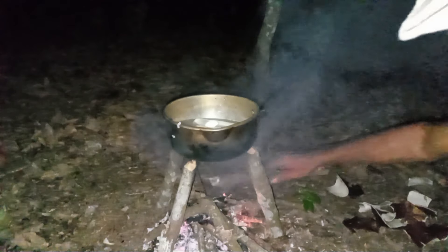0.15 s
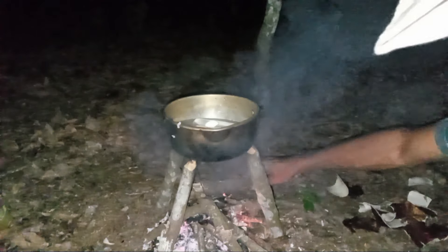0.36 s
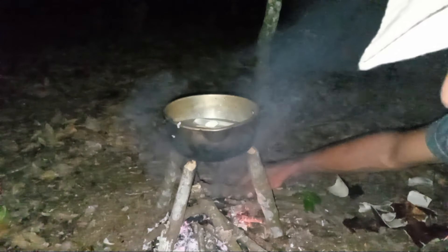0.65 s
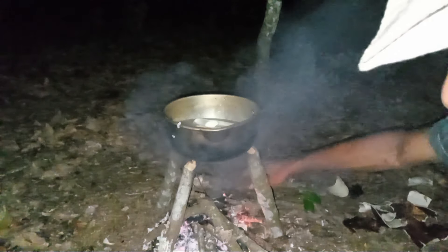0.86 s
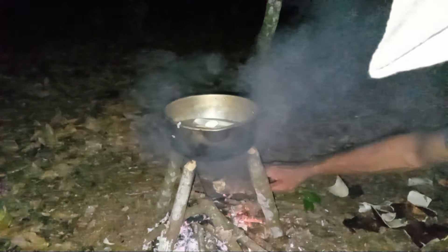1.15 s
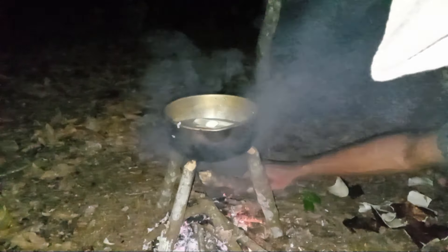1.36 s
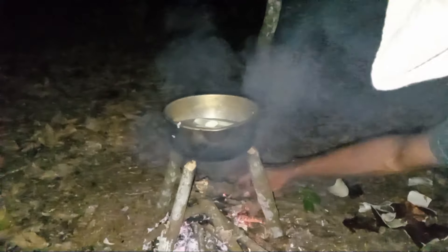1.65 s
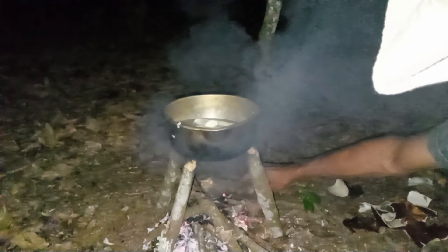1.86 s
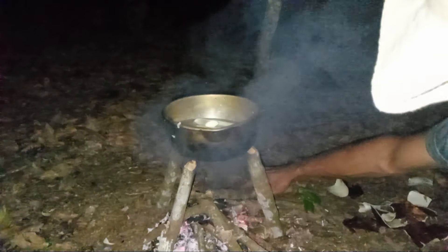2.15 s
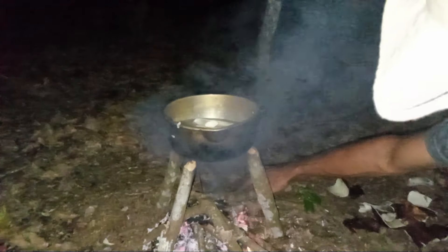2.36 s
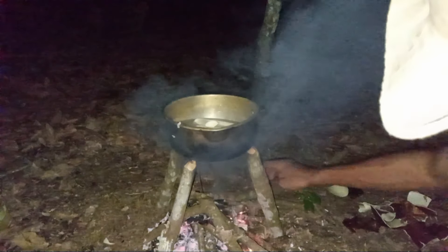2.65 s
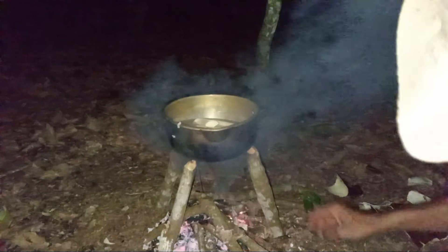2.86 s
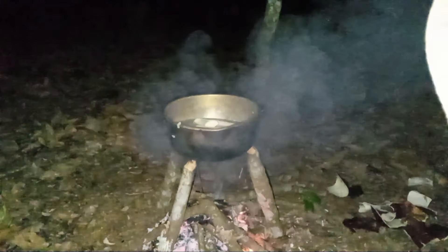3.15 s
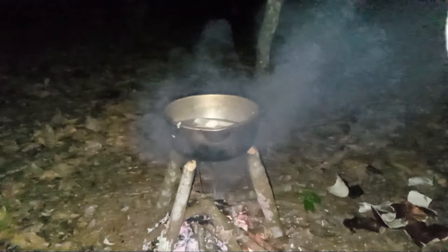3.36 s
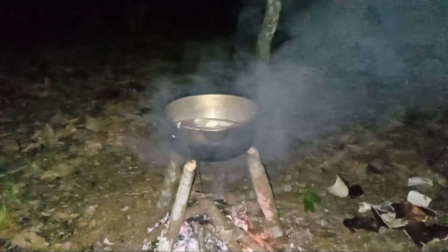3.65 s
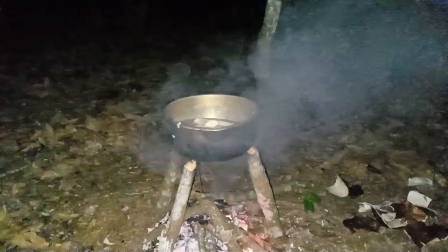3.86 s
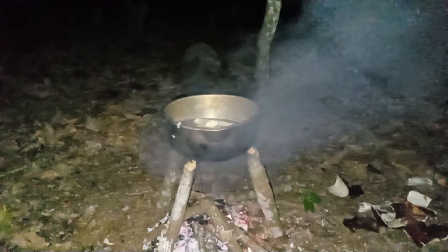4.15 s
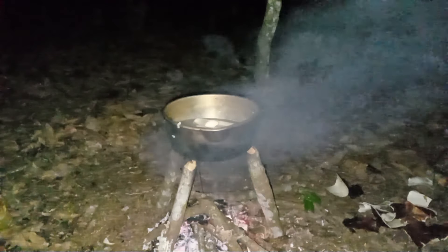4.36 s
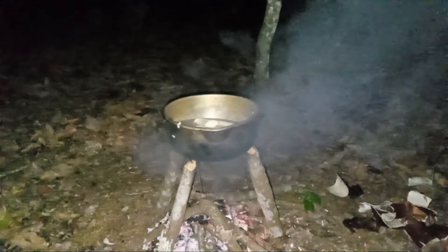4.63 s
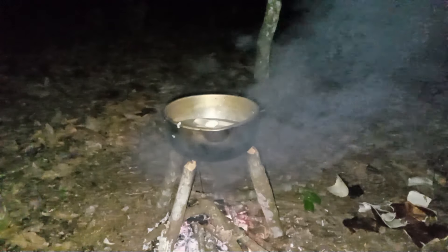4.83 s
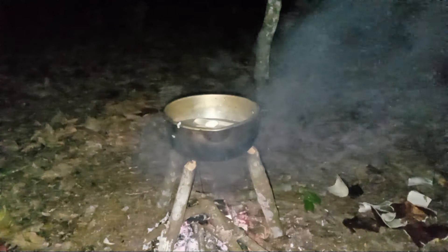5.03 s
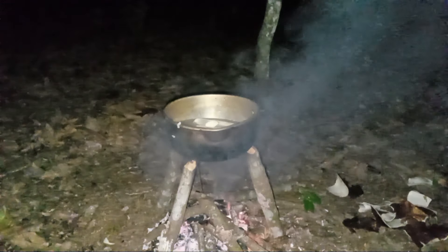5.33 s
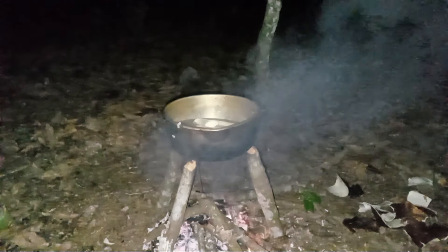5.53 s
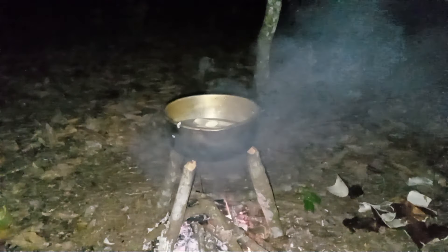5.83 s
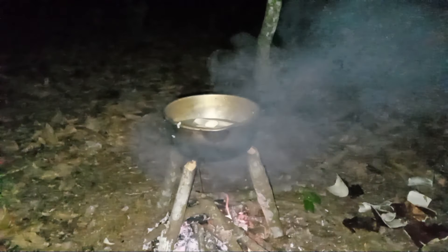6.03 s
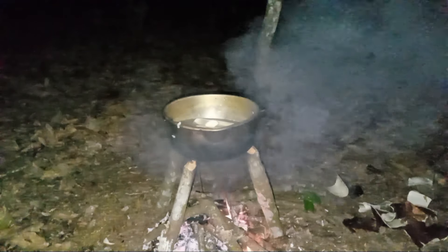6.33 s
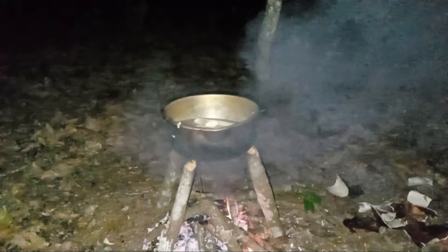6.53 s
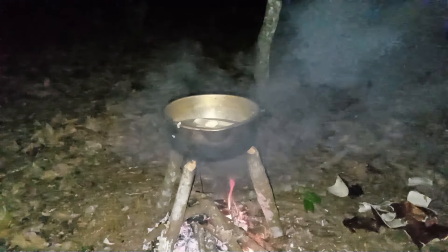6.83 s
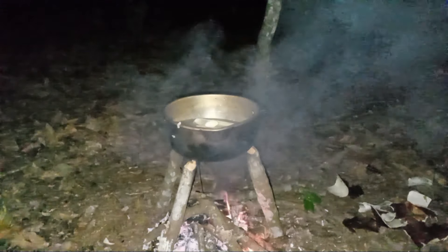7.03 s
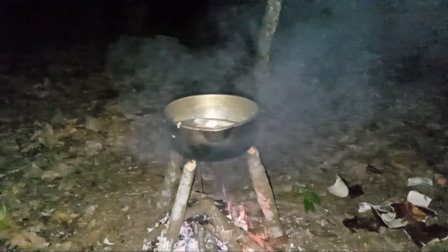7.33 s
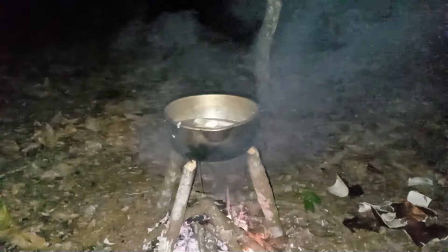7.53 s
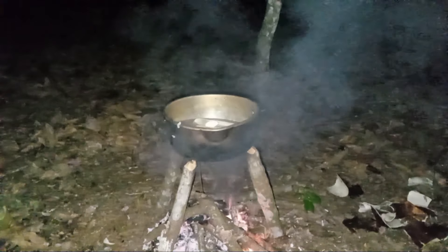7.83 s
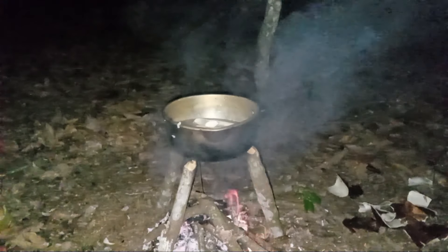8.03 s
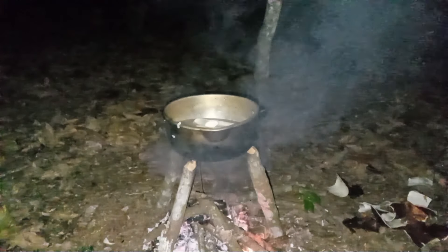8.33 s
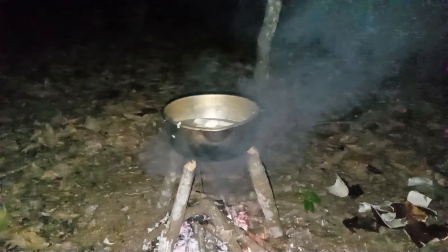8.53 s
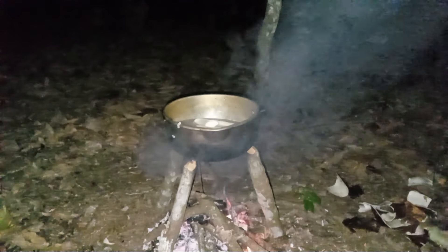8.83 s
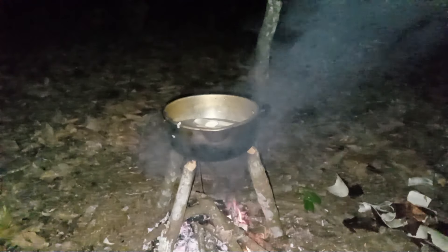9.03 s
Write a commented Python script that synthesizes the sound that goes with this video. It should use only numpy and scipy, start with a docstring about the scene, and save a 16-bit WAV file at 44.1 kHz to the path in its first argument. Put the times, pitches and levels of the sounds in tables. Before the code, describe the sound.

Crickets trill steadily in a night forest, one near cricket chirping loudly in two bouts, while a small wood fire snaps faintly.

```python
"""A near cricket chirps in two bouts in a night forest, each wing stroke a falling, nearly pure tone.
A farther cricket answers. Close by, a small wood fire snaps as gas pockets burst, and sticks
knock and scrape as they are pushed through embers and dry leaves. Behind are a steady chorus
of crickets, katydids buzzing as file teeth strike their wings, and faint night air."""
import sys
import numpy as np
from scipy import signal
from scipy.fft import rfft, irfft, next_fast_len
from scipy.io import wavfile

SR = 44100
rng = np.random.default_rng(int(sys.argv[2]) if len(sys.argv) > 2 else 0)


def materialize(psi):
    """Save the field psi as 16-bit PCM at rate SR to the path in sys.argv[1].

    A 1-D psi becomes a single channel; in a 2-D psi each row is a channel.
    """
    bounded = np.clip(np.atleast_2d(psi).T, -1, 1)
    quanta = np.round(bounded * 32767).astype(np.int16)
    wavfile.write(sys.argv[1], SR, quanta)


N = 405279
TIME = np.arange(N) / SR


def from_db(db):
    """Decibels to gain."""
    return 10 ** (np.asarray(db) / 20)


def rms_one(x):
    """Scale to rms 1."""
    return x / np.sqrt(np.mean(x ** 2) + 1e-20)


def gain_curve(rows):
    """Gain per sample from (seconds, dB) points."""
    return from_db(np.interp(TIME, *np.transpose(rows)))


def drift(rate_hz):
    """Random curve of spread 1, with rate_hz knots a second."""
    knots = rng.standard_normal(4096)
    return np.interp(TIME * rate_hz, np.arange(len(knots)), knots) * np.sqrt(3 / 2)


def coloured(x, spectrum):
    """Filter by (Hz, dB) points, falling 100 dB per octave past the ends; rms 1."""
    size = next_fast_len(len(x))
    octave = np.log2(np.maximum(np.fft.rfftfreq(size, 1 / SR), 1))
    hz, db = np.transpose(spectrum)
    outside = np.abs(octave - np.clip(octave, np.log2(hz[0]), np.log2(hz[-1])))
    gain = from_db(np.interp(octave, np.log2(hz), db) - 100 * outside)
    return rms_one(irfft(rfft(x, size) * gain, size)[:len(x)])


def noise(spectrum):
    """Coloured noise; rms 1."""
    return coloured(rng.standard_normal(N), spectrum)


def grains(per_s, spread_db):
    """Tiny breaks in random clumps, mostly small, a few large."""
    born = rng.random(N) < per_s * from_db(6 * drift(90)) / SR
    return born * rng.choice([-1, 1], N) * from_db(spread_db * np.minimum(rng.exponential(1, N), 4))


def add(out, start_s, sound):
    """Mix a short sound in at start_s."""
    at = max(round(start_s * SR), 0)
    out[at:at + len(sound)] += sound[:max(N - at, 0)]


def swell(peak_s, half_s):
    """Bell-shaped envelope."""
    return np.exp(-np.minimum(((TIME - peak_s) / half_s) ** 2, 20))


def dip(rows, fall_s, recover_s):
    """Gain that sinks, holds and recovers once per row."""
    return from_db(sum(np.interp(TIME, [s - fall_s, s, s + hold_s, s + hold_s + recover_s], [0, db, db, 0])
                       for s, hold_s, db in rows))


def thin(x, edge_hz):
    """High-pass: small things radiate little below edge_hz."""
    return signal.sosfilt(signal.butter(2, edge_hz, "high", fs=SR, output="sos"), x)


def forest(x, wet_db, t60_s):
    """Trunks and leaves scatter a dying tail after the direct sound."""
    t = np.arange(SR // 2) / SR
    tail = rng.standard_normal(len(t)) * from_db(-60 * t / t60_s) * (t > .004)
    return x + from_db(wet_db) * signal.fftconvolve(x, tail / np.linalg.norm(tail))[:N]


# One stroke, the wing slowing as it closes. Each row: time in ms, pitch in Hz, amplitude from 0 to 1.
WING_STROKE = [(-3.5, 6300, 0), (-1.5, 5900, .09), (0, 5440, .2), (3, 5350, .8), (6, 5240, .76),
               (8.4, 5080, .06), (10, 5080, .66), (11.5, 5090, 1), (13.3, 5070, .68), (15, 4830, .45),
               (16.3, 4790, .54), (18.2, 4720, .47), (20, 4620, .18), (23, 4540, 0)]
# Levels of a stroke's first three harmonics in dB.
HARMONICS_DB = [0, -26.5, -38.5]

def cricket(chirps, pitch_ratio, pitch_spread, pace_spread, first_db, first_edge_db, rough,
            fade_db_per_ms=0, period_s=.040):
    """Each wing closing is a falling tone; a chirp's first stroke is softer and edgier."""
    out = np.zeros(N)
    ms, hz, amplitude = np.transpose(WING_STROKE)
    t_ms = np.arange(ms[0], ms[-1] + 2, 1000 / SR)
    strokes = [(s + k * period_s, k == 0) for s, count in chirps for k in range(round(count))]
    for (s, first), (detune, pace, force) in zip(strokes, rng.standard_normal((len(strokes), 3))):
        closing_ms = t_ms * (1 + pace_spread * pace)
        pitch_hz = np.interp(closing_ms, ms, hz) * pitch_ratio * (1 + pitch_spread * detune)
        phase = 2 * np.pi * np.cumsum(pitch_hz) / SR
        tone = sum(from_db(db + first_edge_db * (first and k == 2)) * np.sin(k * phase)
                   for k, db in enumerate(HARMONICS_DB, 1))
        gain = from_db(first_db * first + .5 * force - fade_db_per_ms * t_ms)
        add(out, s + t_ms[0] / 1000, gain * np.interp(closing_ms, ms, amplitude) * tone)
    wing_pressure = from_db(.8 * drift(150))
    tooth_catch = 1 + rough * drift(1500)
    return out * wing_pressure * tooth_catch


# Near chirps. Each row: start in seconds, number of wing strokes.
NEAR_SONG = [(.055, 3), (.273, 3), (.527, 2), (.7485, 2), (.963, 2), (1.169, 3), (1.388, 3), (4.894, 2),
             (5.1145, 3), (5.332, 3), (5.569, 3), (5.7865, 3), (6.0025, 3), (6.260, 2), (6.475, 2),
             (6.695, 3)]
# Singing effort. Each row: time in seconds, gain in dB.
NEAR_EFFORT = [(1.5, -29.6), (4.8, -29.5)]

def near_cricket():
    """Two bouts of clean chirps among the trees."""
    song = cricket(NEAR_SONG, pitch_ratio=1, pitch_spread=.0064, pace_spread=.026,
                   first_db=-1, first_edge_db=7.5, rough=.059)
    return gain_curve(NEAR_EFFORT) * forest(song, wet_db=-13, t60_s=.13)


# Answering chirps. Each row: start in seconds, number of wing strokes.
FAR_SONG = [(3.517, 1), (3.649, 2), (3.994, 1), (4.209, 2), (4.858, 1), (7.106, 1), (7.321, 2), (7.576, 2),
            (7.746, 2), (7.959, 2), (8.170, 2), (8.386, 2)]

def far_cricket(level_db):
    """Shorter, higher, rougher chirps from farther off."""
    song = cricket(FAR_SONG, pitch_ratio=1.057, pitch_spread=.0066, pace_spread=.033,
                   first_db=-2.5, first_edge_db=2, rough=.17, fade_db_per_ms=.5)
    return from_db(level_db) * forest(song, wet_db=-13.5, t60_s=.16)


# Snaps of burning wood. Each row: start in seconds, relative level in dB.
WOOD_SNAPS = [(1.639, -43), (2.641, -52), (3.097, -35), (3.3714, -38), (3.4542, -37.5), (3.7904, -41),
              (3.7948, -31), (4.019, -43), (4.1156, -29.5), (4.165, -38.5), (4.2576, -31), (5.2983, -33.5),
              (5.749, -45), (6.2265, -35), (6.257, -33), (7.457, -42), (7.535, -35), (7.559, -39),
              (7.58, -40), (7.642, -40), (8.122, -36), (8.2, -35), (8.239, -39), (8.686, -37),
              (9.0445, -29)]
# Spectrum of a crack. Each row: frequency in Hz, relative level in dB.
CRACK_SPECTRUM = [(1400, -22), (2400, -23), (4000, -8), (7000, -6), (10800, 5), (13000, -7), (16000, -8)]

def snaps(level_db, crack_s=.0012, tail_db=-20, tail_t60_s=.11):
    """A gas pocket bursts: a bright crack, then a faint tail."""
    out = np.zeros(N)
    t = np.arange(SR // 5) / SR
    burst = np.exp(-np.minimum((t / crack_s) ** 2, 20))
    for s, db in WOOD_SNAPS:
        hiss = coloured(rng.standard_normal(len(t)), CRACK_SPECTRUM)
        crack = rms_one(hiss * burst) * np.sqrt(np.mean(burst ** 2))
        tail = hiss * from_db(tail_db - 60 * t / tail_t60_s)
        add(out, s, from_db(level_db + db) * (crack + tail))
    return thin(out, edge_hz=2600)


# Sticks dragged through ash and leaves. Each row: peak time in seconds, half length in seconds,
# relative scrape and crinkle levels in dB, stick resonance in Hz.
STICK_DRAGS = [(1.678, 0.17, -89, -86, 1600), (2.187, 0.033, -79, -70, 1500),
               (3.57, 0.091, -74.5, -65, 1390), (3.796, 0.0062, -55, -49.5, 2520),
               (3.817, 0.055, -66, -62, 1200), (6.244, 0.053, -70, -58.5, 2520),
               (7.327, 0.063, -69.5, -75, 2230), (7.467, 0.037, -69, -64, 1300),
               (7.608, 0.076, -66, -57.5, 2600), (7.745, 0.045, -70.5, -62, 2730),
               (8.087, 0.015, -64, -60, 2060), (8.233, 0.056, -71.5, -66, 2860),
               (8.642, 0.054, -71, -62, 1980), (8.852, 0.031, -69, -66.5, 950)]
# Spectra of bark and of dry leaves. Each row: frequency in Hz, relative level in dB.
BARK_SPECTRUM = [(300, -12), (550, -2), (880, 0.5), (1130, 0.5), (1450, 1.5), (2600, 4), (6000, -8)]
LEAF_SPECTRUM = [(2500, -24), (5000, 1), (8000, -2.5), (11000, 5), (13500, -19), (16000, -12)]

def drags(scrape_db, crinkle_db, wood_spread_db=3.5, body_db=6.5, body_octaves=.5):
    """Bark scrapes through each stick's broad resonance; leaves and charcoal crinkle above it."""
    scrape, crinkle_gain = np.zeros(N), np.zeros(N)
    slips = grains(per_s=600, spread_db=2)
    hz = np.geomspace(300, 6000, 48)
    bark_db = np.interp(hz, *np.transpose(BARK_SPECTRUM))
    for s, half_s, low_db, high_db, body_hz in STICK_DRAGS:
        push = swell(s, half_s)
        resonance_db = body_db * np.exp(-(np.log2(hz / body_hz) / body_octaves) ** 2)
        stick_db = bark_db + wood_spread_db * rng.standard_normal(len(hz)) + resonance_db
        scrape += push * from_db(low_db + scrape_db) * coloured(slips, np.column_stack([hz, stick_db]))
        crinkle_gain += push * from_db(high_db + crinkle_db)
    return scrape + crinkle_gain * coloured(grains(per_s=1500, spread_db=1.2), LEAF_SPECTRUM)


# Sticks knocking together. Each row: start in seconds, level in dB, t60 in seconds, three modes in Hz.
STICK_KNOCKS = [(3.097, -54, 0.0099, 426, 1130, 1610), (3.794, -52.5, 0.038, 850, 1400, 2050),
                (4.166, -68.5, 0.04, 805, 1140, 2090), (5.394, -57, 0.026, 820, 1290, 2560),
                (6.225, -61, 0.023, 1860, 2320, 2640), (7.455, -62, 0.03, 1250, 2420, 2760),
                (7.632, -58.5, 0.029, 615, 1180, 2440), (8.081, -61, 0.033, 1500, 2100, 2520),
                (8.121, -40, 0.01, 560, 766, 1180), (8.238, -46.5, 0.044, 3100, 3470, 4340),
                (8.6, -62, 0.048, 893, 2070, 2420), (8.851, -58.5, 0.034, 955, 2680, 3010),
                (9.045, -57, 0.03, 2360, 2530, 2700)]

def knocks(thud_db, thud_t60_s):
    """A struck stick thuds and rings briefly in three modes."""
    out = np.zeros(N)
    t = np.arange(SR // 5) / SR
    for s, db, t60_s, *modes_hz in STICK_KNOCKS:
        modes = sum((-1) ** k * np.sin(2 * np.pi * hz * t) for k, hz in enumerate(modes_hz))
        ring = modes * from_db(-60 * t / t60_s)
        thud = coloured(rng.standard_normal(len(t)), BARK_SPECTRUM)
        thud *= from_db(thud_db - 60 * t / thud_t60_s)
        add(out, s, from_db(db) * (ring + thud))
    return forest(thin(out, edge_hz=330), wet_db=-8.5, t60_s=.11)


# Chorus bands, one per kind of insect. Each row: frequency in Hz, relative level in dB.
LOW_BAND = [(3100, -43), (3380, -28), (3520, -7), (3640, -0.5), (3820, -0.5), (3950, -6), (4080, -10.5),
            (4200, -40.5)]
MID_BAND = [(4200, -38.5), (4450, -24.5), (4700, -12), (5000, -1.5), (5320, 1.5), (5650, -3.5),
            (6000, -14.5), (6380, -6.5), (6800, -12.5), (7150, -22.5), (7550, -31)]
HIGH_BAND = [(7300, -32), (7850, -21.5), (8100, -13), (8350, -10), (8750, -3.5), (9250, -0.5), (9550, -9.5),
             (9900, -12.5), (11000, -26.5), (12500, -43.5)]
# Some of the lowest crickets rest. Each row: start in seconds, hold in seconds, gain in dB.
LOW_RESTS = [(2.2, 0.058, -9.5), (4.95, 0.67, -4.5), (7.26, 0.28, -6)]
# Strength of the whole chorus. Each row: time in seconds, gain in dB.
CHORUS_GAIN = [(0, -55), (2.0, -54), (3.1, -57.5), (3.55, -54.5), (9.19, -54)]

def chorus():
    """Countless far wing strokes merge into three bands that flutter and sway."""
    def band(spectrum, flutter_db, flutter_hz, sway_db):
        return noise(spectrum) * from_db(flutter_db * drift(flutter_hz) + sway_db * drift(9))

    low = band(LOW_BAND, flutter_db=.52, flutter_hz=70, sway_db=.87)
    low *= dip(LOW_RESTS, fall_s=.073, recover_s=.25)
    mid = band(MID_BAND, flutter_db=1.5, flutter_hz=59, sway_db=.8)
    high = band(HIGH_BAND, flutter_db=1.6, flutter_hz=150, sway_db=.85)
    return gain_curve(CHORUS_GAIN) * (from_db(-2) * low + mid + from_db(-5.5) * high)


# Katydid buzzes. Each row: peak time in seconds, rise in seconds, relative level in dB.
KATYDID_BUZZES = [(0.296, 0.079, -64), (0.678, 0.049, -64.5), (.95, 0.094, -68), (1.192, 0.057, -63),
                  (1.385, 0.047, -62), (1.698, 0.064, -62), (2.13, 0.047, -67), (2.304, 0.092, -64.5),
                  (2.824, 0.064, -62.5), (3.399, 0.071, -62), (3.98, 0.14, -63.5), (4.483, 0.083, -64.5),
                  (4.94, 0.091, -65), (5.11, 0.065, -65), (5.64, 0.045, -65.5), (6.476, 0.11, -62),
                  (7.007, 0.052, -66), (7.972, 0.05, -64.5), (8.49, 0.092, -62), (9.12, 0.1, -62.5)]
# Resonance of a katydid's wing. Each row: frequency in Hz, relative level in dB.
WING_SPECTRUM = [(9200, -16.5), (9850, 2.5), (10300, 3.5), (10900, 0.5), (11550, -3.5), (12050, -13),
                 (12800, -27)]

def katydids(level_db, teeth_per_s=341, rate_spread=.0067, glide_per_s=.026, jitter=.0017,
             wing_spread=.016, rasp_db=-15.5, fall_ratio=1.71, flutter_db=2.1):
    """File teeth strike the wing at an unsteady pace, giving a comb of blurred high lines."""
    out, lead_s = np.zeros(N), .25
    t = np.arange(SR) / SR - lead_s
    variations = rng.uniform(-1, 1, (len(KATYDID_BUZZES), 3))
    for (s, rise_s, db), (pace, slide, detune) in zip(KATYDID_BUZZES, variations):
        unsteady = jitter * drift(teeth_per_s / 2)[:SR]
        tooth_hz = teeth_per_s * (1 + rate_spread * pace + glide_per_s * slide * t + unsteady)
        cycles = np.cumsum(tooth_hz) / SR
        teeth = rms_one(np.sinc((cycles % 1 - .5) * SR / teeth_per_s))
        rasp = from_db(rasp_db) * rng.standard_normal(len(t))
        wing = [(hz * (1 + wing_spread * detune), wing_db) for hz, wing_db in WING_SPECTRUM]
        width_s = rise_s * np.where(t < 0, 1, fall_ratio)
        push = np.exp(-np.minimum(np.abs(t / width_s) ** 3, 20))
        add(out, s - lead_s, from_db(level_db + db) * push * coloured(teeth + rasp, wing))
    return forest(out * from_db(flutter_db * drift(60)), wet_db=1, t60_s=.071)


# Crickets standing out of the chorus. Each row: pitch in Hz, strokes per second, relative level in dB.
CRICKET_TRILLS = [(3632, 63, -64.5), (3730, 45, -70), (3815, 52, -66.5), (5546, 58, -66), (5714, 49, -69),
                  (6396, 63, -73)]

def trills(level_db, pulse_depth, wander_hz, sway_db):
    """Single crickets each hold a pitch and pulse it without pause."""
    out = np.zeros(N)
    for hz, per_s, db in CRICKET_TRILLS:
        stroke_hz = per_s * (1 + .015 * drift(5))
        wings = 1 + pulse_depth * np.sin(2 * np.pi * np.cumsum(stroke_hz) / SR)
        tone = np.sin(2 * np.pi * np.cumsum(hz + wander_hz * drift(25)) / SR)
        out += from_db(level_db + db + sway_db * drift(6.5)) * wings * tone
    return out


# Dull scuffs. Each row: peak time in seconds, half length in seconds, level in dB.
GROUND_SCUFFS = [(2.544, 0.029, -83), (3.21, 0.42, -89.5), (5.532, 0.29, -85), (8.228, 0.049, -73.5)]
# Spectrum of a scuff. Each row: frequency in Hz, relative level in dB.
SCUFF_SPECTRUM = [(250, -22), (380, -5), (460, -3.5), (620, -15)]

def scuffs():
    """Something shifts softly on bare earth."""
    return noise(SCUFF_SPECTRUM) * sum(from_db(db) * swell(s, half_s) for s, half_s, db in GROUND_SCUFFS)


# Spectrum of the flames. Each row: frequency in Hz, relative level in dB.
FLAME_SPECTRUM = [(22, -15), (45, 3.5), (70, 0), (130, -12)]

def flames(start_db, growth_db_per_s, flutter_db):
    """A low flutter that grows as the fire catches."""
    return from_db(start_db + growth_db_per_s * TIME + flutter_db * drift(14)) * noise(FLAME_SPECTRUM)


def embers(level_db):
    """Embers tick faintly at random."""
    ticks = coloured(grains(per_s=9, spread_db=4), CRACK_SPECTRUM)
    return from_db(level_db) * forest(ticks, wet_db=-13, t60_s=.041)


# Spectrum of the night air. Each row: frequency in Hz, relative level in dB.
AIR_SPECTRUM = [(25, -13), (80, 1), (140, -2), (220, -9.5), (350, -15), (700, -21), (9000, -19.5),
                (16000, -26.5)]

def night_air(level_db, stir_db, rumble_top_hz=250):
    """An even, faint hiss over a stirring rumble."""
    air = from_db(level_db) * noise(AIR_SPECTRUM)
    rumble = signal.sosfiltfilt(signal.butter(2, rumble_top_hz, fs=SR, output="sos"), air)
    hiss = air - rumble
    return hiss + rumble * from_db(stir_db * drift(17))


# Brief dips in the level of all insects. Each row: start in seconds, hold in seconds, gain in dB.
INSECT_DIPS = [(2.19, 0.066, -5), (2.3, 1, -1), (3.125, 0.025, -10.5), (3.17, 0.25, -2.5),
               (3.395, 0.032, -6.5)]

def scene():
    """Insects all around, the fire close by; mono."""
    insects = chorus() + trills(level_db=-3.5, pulse_depth=.15, wander_hz=5.85, sway_db=5.5)
    insects += katydids(level_db=-1)
    insects += near_cricket() + far_cricket(level_db=-36.5)
    insects *= dip(INSECT_DIPS, fall_s=.02, recover_s=.053)
    fire = snaps(level_db=-4) + knocks(thud_db=-6, thud_t60_s=.007)
    fire += drags(scrape_db=.5, crinkle_db=5.5) + scuffs()
    fire += flames(start_db=-89, growth_db_per_s=.69, flutter_db=4.5) + embers(level_db=-90)
    return (insects + fire + night_air(level_db=-79, stir_db=3))[None]


def record(dry):
    """Steep low-pass at 15.9 kHz."""
    return signal.sosfilt(signal.ellip(10, .1, 70, 15900, fs=SR, output="sos"), dry)


dry = scene()
out = record(dry)
materialize(out)
```